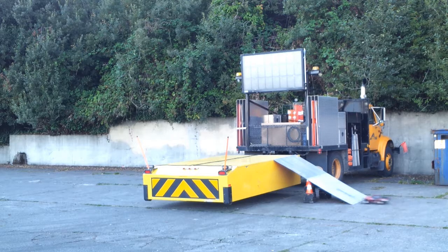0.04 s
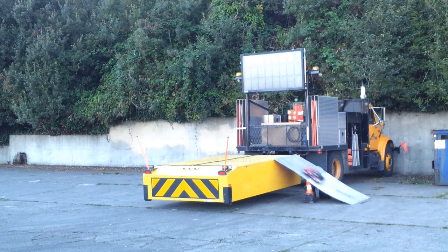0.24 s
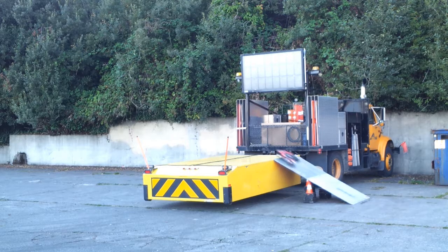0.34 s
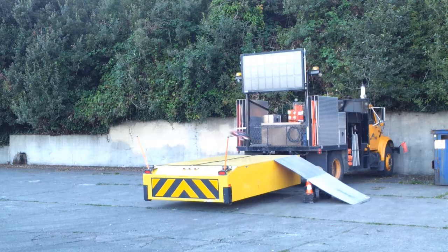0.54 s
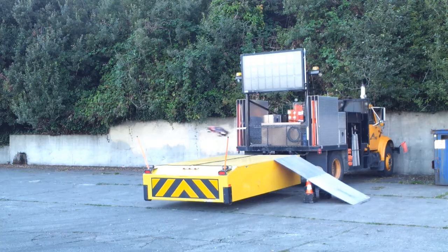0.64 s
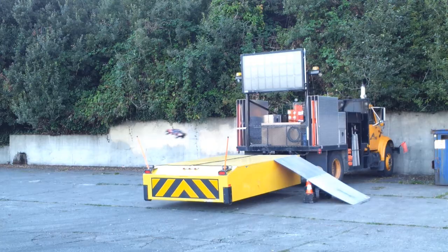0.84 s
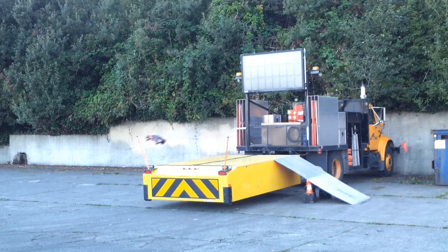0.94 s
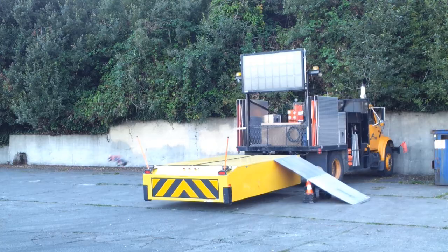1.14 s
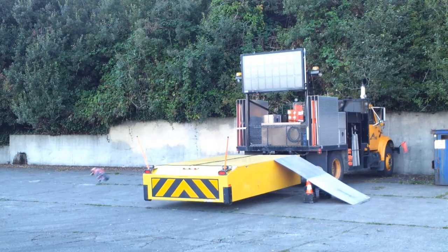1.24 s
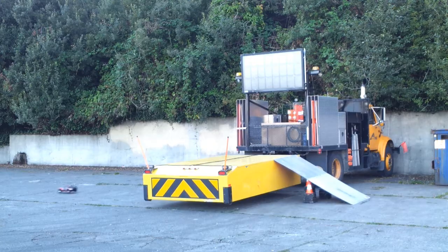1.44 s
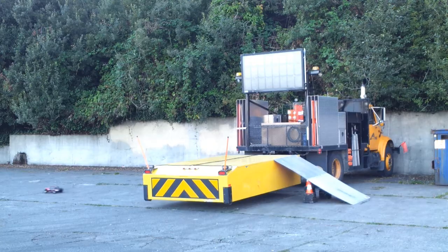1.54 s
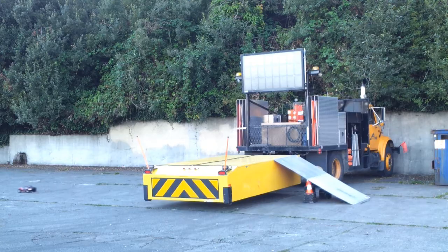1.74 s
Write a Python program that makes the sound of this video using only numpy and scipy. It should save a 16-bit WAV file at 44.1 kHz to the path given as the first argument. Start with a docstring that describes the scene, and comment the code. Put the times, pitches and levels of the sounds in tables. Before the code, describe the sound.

A small remote-controlled car whines, clatters up a ramp, then slaps down on pavement.

```python
"""A paved yard, quiet outdoor air. A small radio-controlled car whines in on gritty tyres and hits a
sheet ramp: the panel knocks, rings and booms, its loose metal clinks, and the chassis scrapes up it.
The car flies for a second, gears faintly whirring, then slaps down on one axle and the other, its
plastic shell clattering, and rolls on. A parked truck and a wall throw the blows and the whine back."""
import sys
import numpy as np
from scipy import signal
from scipy.fft import rfft, irfft
from scipy.io import wavfile
from scipy.ndimage import uniform_filter1d

SR = 44100
rng = np.random.default_rng(int(sys.argv[2]) if len(sys.argv) > 2 else 0)


def generate_wav(sig):
    """Save sig (samples, or channels by samples) to the path in sys.argv[1] as 16-bit PCM at SR."""
    pcm = np.round(np.clip(np.atleast_2d(sig).T, -1, 1) * 32767).astype(np.int16)
    wavfile.write(sys.argv[1], SR, pcm)


N = 79380
T = np.arange(N) / SR

# Motor revs up to take-off. Each row: time in seconds, shaft speed in Hz.
SHAFT_SPEED = [(0, 441), (.015, 438), (.035, 496), (.06, 547.7), (.08, 490), (.105, 455.7), (.135, 485.4),
               (.18, 543.4), (.205, 483), (.25, 445), (.36, 448.6), (.43, 489)]
# Motor and gear tones. Each row: shaft multiple, relative level in dB, peak time and spread in seconds.
DRIVE_TONES = [(2, 0.5, 0.034, 0.26), (8, -2, 0.02, .05), (9, -6.5, 0.11, 0.16), (11, -9, 0.12, 0.021),
               (13, -8.5, 0.1, 0.015)]
# The fader ride on the tyres. Each row: time in seconds, level in dB.
TYRE_LEVEL = [(0, -38), (.36, -36.5), (.43, -42), (.65, -48), (1.46, -58.5), (1.55, -37), (1.66, -50),
              (1.8, -63)]
# The wheels strike the ramp and it settles. Each row: start in seconds, rumble level in dB,
# rumble decay (t60) in seconds, knock level in dB, knock pitch in Hz.
RAMP_BLOWS = [(0.2197, -16.5, 0.085, -7.5, 334), (0.2387, -16.5, 0.077, -8.5, 438.4),
              (.2528, -14, 0.11, -6.5, 393), (.277, -27.5, 0.2, -27, 460), (.307, -27.5, .18, -26, 426),
              (.458, -34.5, 0.2, -42, 444)]
# The ring of the whole sheet. Each row: pitch in Hz, relative level in dB, t60 in seconds.
RAMP_MODES = [(134.2, -2, 0.41), (238, -3, .3), (301, 3, 0.12), (416, 3, 0.058), (463, 3, 0.17),
              (665, -2, 0.1)]
# The panel under a wheel. Each row: multiple of the knock pitch, relative level in dB, t60 in seconds.
KNOCK_MODES = [(1, -1, 0.038), (1.73, -4, 0.036)]
# Loose metal on the ramp. Each row: start in seconds, level in dB, pitch in Hz.
CLINKS = [(.219, -24.5, 6700), (.233, -24.5, 6500), (.246, -23, 6640), (0.253, -19, 6460),
          (.259, -17.5, 6400), (0.263, -17, 6190), (0.2771, -11, 6880), (0.2802, -17.5, 6020),
          (0.299, -21, 6940)]
# The chassis hits the ramp, later the paving. Each row: start in seconds, clatter level in dB,
# clatter t60 in seconds, favoured pitch in Hz, ring level in dB.
SLAPS = [(0.258, -23, .019, 700, -36), (1.4692, -33, 0.039, 1233, -35), (1.4735, -17.5, 0.039, 2070, -16.5),
         (1.478, -18.5, 0.017, 1380, -29), (1.4807, -21.5, 0.029, 1233, -16),
         (1.5091, -17.5, 0.05, 430, -13.5), (1.5162, -17.5, 0.019, 735, -7.5),
         (1.5202, -20.5, .041, 270, -18.5), (1.525, -19, 0.023, 735, -22)]
# The ring of the plastic shell. Each row: pitch in Hz, relative level in dB, t60 in seconds.
SHELL_MODES = [(268, 1, 0.045), (428, -8, 0.049), (735, -4, 0.053), (1240, 3.5, 0.044), (2085, 2.5, 0.024)]
# Soft rattles of the settling ramp. Each row: peak time in seconds, level in dB, spread in seconds.
RATTLES = [(0.323, -31, 0.018), (.482, -35, 0.013), (0.633, -39, 0.011), (.679, -34, 0.0031),
           (0.699, -41, 0.0072)]
# The hardest contacts of the landing. Each row: start in seconds, level in dB, t60 in seconds.
SNAPS = [(1.4745, -20.5, 0.0056), (1.5102, -32, .008), (1.5198, -35, 0.011)]
# The two axles come down. Each row: start in seconds, level in dB.
AXLE_THUDS = [(1.476, -21), (1.514, -19)]

# EQ curves that shape the noise layers. Each row: frequency in Hz, relative level in dB.
TYRE_EQ = [(30, -23), (70, 0.5), (130, -3.5), (400, -1.5), (800, 7.5), (1500, 1), (3200, -4.5),
           (7200, -1.5), (9000, -23.5), (11000, -16), (14000, -47)]  # midrange roll
AIR_EQ = [(25, -56), (59, 1), (149, -7), (1330, -11), (1740, -17), (2690, -19.5), (6210, -21.5),
          (8590, -37), (16000, -38.5)]  # low outdoor wash
RUMBLE_EQ = [(40, -37), (80, -24), (130, -4), (600, 2), (1100, -7), (2400, -12), (4000, -25), (14000, -56)]  # body of a blow on the ramp
CLINK_EQ = [(1000, -11.5), (3800, -19.5), (5400, -11.5), (6500, -5.5), (7100, -8.5), (9000, -19.5),
            (15000, -62)]  # bright metal sizzle
SCRAPE_EQ = [(2000, -10), (4200, -12), (6700, 3), (9000, -20.5), (10800, -11.5), (14000, -43)]  # thin, hissy scrape
CLATTER_EQ = [(40, -38), (100, -0.5), (240, 7.5), (800, 4), (3500, -3.5), (5200, 0), (7000, 1.5),
              (8500, -26), (11000, -14.5), (16000, -35)]  # broad plastic clatter
BOOM_EQ = [(85, -37), (135, -4), (170, -3.5), (230, -1), (310, -4), (420, -38), (2000, -70)]  # low resonances of the ramp
JUDDER_EQ = [(200, -23), (330, -7), (520, 2.5), (800, -12.5), (2400, -10.5), (4000, -48)]  # hollow mids of the sheet
WHIRR_EQ = [(1500, -14), (2700, -7.5), (6500, -2.5), (8200, -23)]  # airy gear noise
SNAP_EQ = [(5000, -2), (11000, -2), (15000, -7)]  # crisp top of the landing
THUD_EQ = [(40, -44), (100, -12), (250, -3), (700, 2), (950, -3), (2000, -50)]  # dull tyres and springs
YARD_EQ = [(60, -10.5), (150, 6.5), (3500, 8), (9000, 1.5), (15000, -55)]  # tone of the reflections


def amp(db):
    """Decibels to gain."""
    return 10 ** (np.asarray(db) / 20)


def unit(x):
    """Scale to rms 1."""
    return x / np.sqrt(np.mean(x ** 2))


def noise():
    """White noise."""
    return rng.standard_normal(N)


def wander(rate_hz):
    """Smooth random drift of rms 1."""
    width = int(SR / rate_hz)
    return unit(uniform_filter1d(uniform_filter1d(noise(), width), width))


def rise(attack_s):
    """Soft attack."""
    return 1 - np.exp(-T / attack_s)


def fade(t60):
    """A decay that falls 60 dB in t60 seconds."""
    return amp(-60 * T / t60)


def swell(peak_s, spread_s):
    """Bell-shaped rise and fall."""
    return np.exp(-((T - peak_s) / spread_s) ** 2)


def at(start_s, x):
    """Cue a sound at a given time."""
    return np.concatenate([np.zeros(int(start_s * SR)), x])[:N]


def eq(x, curve):
    """Shape a sound with a minimum-phase filter of unit power that follows an EQ curve."""
    hz, db = np.array(curve).T
    size = 4096
    bins_hz = np.maximum(np.fft.rfftfreq(size, 1 / SR), 1)
    gain = amp(np.interp(np.log(bins_hz), np.log(hz), db))
    cepstrum = irfft(np.log(gain))
    cepstrum[1:size // 2] *= 2  # folded forward, so nothing rings ahead of a hit
    cepstrum[size // 2 + 1:] = 0
    response = irfft(np.exp(rfft(cepstrum)))
    return signal.fftconvolve(x, response / np.linalg.norm(response))[:N]


def burst(t60):
    """A dying shower of tiny contacts."""
    return np.sign(noise()) * fade(t60)


def ring(modes):
    """Decaying modes, each at a random phase."""
    return sum(amp(db) * fade(t60) * np.sin(2 * np.pi * (hz * T + rng.random()))
               for hz, db, t60 in modes) / np.sqrt(len(modes) / 2)


def motor():
    """A clear motor tone and raspy gear tones track the shaft, each swelling and fading in its own time as the
    car turns."""
    shaft_hz = np.interp(T, *np.array(SHAFT_SPEED).T)
    tones = 0
    for multiple, db, peak_s, spread_s in DRIVE_TONES:
        is_gear = multiple > 2
        jitter, flicker_db = (.02, 4) if is_gear else (.01, 1.5)
        angle = 2 * np.pi * np.cumsum(shaft_hz * (1 + jitter * wander(244))) / SR
        level = amp(db + flicker_db * wander(34)) * swell(peak_s, spread_s)
        tones += level * np.sin(multiple * angle)
    return tones * amp(-35.5)


def tyres():
    """Gritty rolling noise that sinks away during the jump and comes back on landing."""
    grit = noise() * amp(1.55 * wander(750))
    return unit(eq(grit, TYRE_EQ)) * amp(np.interp(T, *np.array(TYRE_LEVEL).T))


def outdoor_air():
    """A near-steady bed of distant outdoor noise."""
    return unit(eq(noise(), AIR_EQ)) * amp(-48.5 + 0.28 * wander(28))


def ramp_knocks():
    """Each blow gives a hollow knock, pitched by where it lands, and sets the whole sheet ringing."""
    out = 0
    for start_s, rumble_db, t60, knock_db, knock_hz in RAMP_BLOWS:
        rumble = eq(burst(t60), RUMBLE_EQ) + amp(-8.5) * ring(RAMP_MODES)
        knock = ring([(ratio * knock_hz, db, decay) for ratio, db, decay in KNOCK_MODES])
        out += at(start_s, rise(0.002) * (amp(rumble_db) * rumble + amp(knock_db) * knock))
    return out


def metal_clinks():
    """Loose metal on the ramp gives short, high pings, each with a faint tail of sizzle."""
    ping_t60, tail_t60 = 0.0098, 0.048
    out = 0
    for start_s, db, hz in CLINKS:
        sizzle = eq(.5 * burst(ping_t60) + amp(-11) * burst(tail_t60), CLINK_EQ)
        ping = np.sin(2 * np.pi * hz * T) * rise(0.00023) * fade(ping_t60)
        out += at(start_s, amp(db) * (sizzle + amp(7.5) * ping))
    return out


def chassis_scrape():
    """The underside drags up the ramp in one brief, gritty hiss."""
    grit = noise() * amp(4 * wander(420))
    return eq(grit, SCRAPE_EQ) * amp(-28) * swell(peak_s=0.27, spread_s=0.046)


def chassis_slaps():
    """The body cracks and clatters; each point of contact favours the shell modes near one pitch."""
    db_per_octave, max_cut_db = 18, 20
    out = 0
    for start_s, clatter_db, t60, favoured_hz, ring_db in SLAPS:
        modes = [(hz, db - min(db_per_octave * abs(np.log2(hz / favoured_hz)), max_cut_db), decay)
                 for hz, db, decay in SHELL_MODES]
        crack = amp(-1.5) * burst(t60=0.0084)
        clatter = eq(burst(t60) + crack, CLATTER_EQ)
        shell = rise(0.00095) * ring(modes)
        out += at(start_s, amp(clatter_db) * clatter + amp(ring_db) * shell)
    return out


def ramp_boom():
    """The whole ramp flexes after the hit and blooms into a low shudder."""
    shudder = rise(attack_s=0.066) * eq(burst(t60=0.48), BOOM_EQ)
    return at(.265, amp(-22.5) * shudder)


def ramp_rattles():
    """Soft, bright jingles come and go as the ramp settles."""
    jingle = unit(eq(eq(noise(), CLINK_EQ), CLINK_EQ))  # two passes narrow the band
    return jingle * sum(amp(db) * swell(peak_s, spread_s) for peak_s, db, spread_s in RATTLES)


def ramp_judder():
    """The sheet keeps shaking unevenly after take-off."""
    flutter = noise() * amp(2.5 * wander(90))
    return eq(flutter, JUDDER_EQ) * amp(-47) * swell(peak_s=0.59, spread_s=0.2)


def gear_whirr():
    """The wheels spin free in the air, and a faint whirr of gears swells before touchdown."""
    return eq(noise(), WHIRR_EQ) * amp(-53 + 2 * wander(73)) * swell(peak_s=1.27, spread_s=0.22)


def landing_snaps():
    """The hardest contacts put a bright edge on the landing."""
    return eq(sum(at(start_s, amp(db) * burst(t60)) for start_s, db, t60 in SNAPS), SNAP_EQ)


def axle_thuds():
    """Tyres and springs take the weight with one dull thud for each axle."""
    return sum(at(start_s, amp(db) * rise(attack_s=0.015) * eq(burst(t60=0.14), THUD_EQ))
               for start_s, db in AXLE_THUDS)


def yard_echoes(send):
    """Close scatter off the truck, a long thin tail and a smeared slapback off the wall."""
    build_up = 1 - swell(peak_s=0, spread_s=0.0068)
    truck = amp(-15) * unit(build_up * fade(t60=0.31) * noise())
    tail = amp(-24) * unit(build_up * fade(t60=2.34) * noise())
    wall = amp(-31.5) * unit(swell(peak_s=0.401, spread_s=0.062) * noise())
    response = eq((truck + tail + wall) / np.sqrt(N), YARD_EQ)
    return signal.fftconvolve(send, response)[:N]


def scene():
    """The mono mix: the blows and some of the whine feed the echoes; tyres, air and whirr stay dry."""
    whine = motor()
    blows = ramp_knocks() + metal_clinks() + chassis_scrape() + chassis_slaps()
    blows += ramp_boom() + ramp_rattles() + ramp_judder()
    blows += landing_snaps() + axle_thuds()
    echoes = yard_echoes(blows + 0.51 * whine)
    return (whine + tyres() + outdoor_air() + blows + gear_whirr() + echoes)[None]


def record(dry):
    """Soft clipping rounds the highest peaks; filters thin the deep bass and cut the very top."""
    ceiling, low_cut_hz, high_cut_hz = .7, 48, 15850
    high_pass = signal.butter(3, low_cut_hz, "high", fs=SR, output="sos")
    low_pass = signal.ellip(10, .2, 80, high_cut_hz, fs=SR, output="sos")
    rounded = ceiling * np.tanh(dry / ceiling)
    return signal.sosfilt(np.vstack([high_pass, low_pass]), rounded)


dry = scene()
out = record(dry)
generate_wav(out)
```